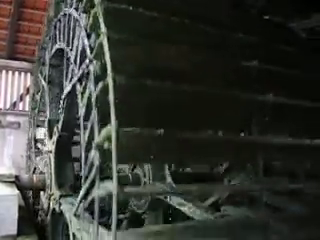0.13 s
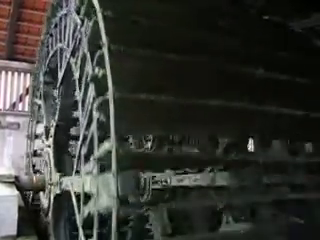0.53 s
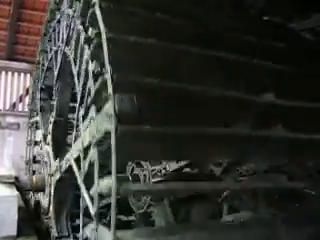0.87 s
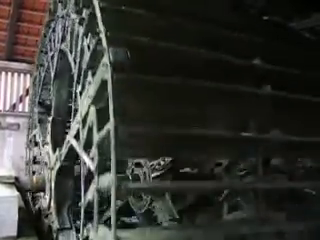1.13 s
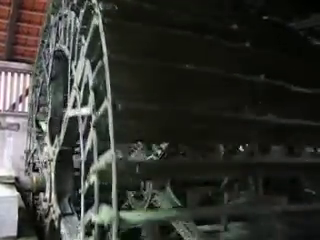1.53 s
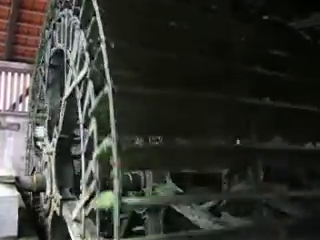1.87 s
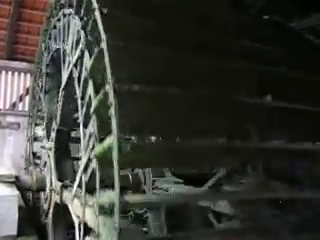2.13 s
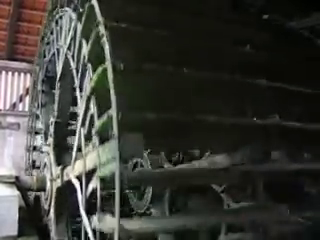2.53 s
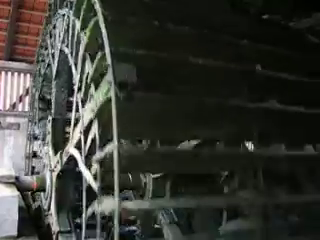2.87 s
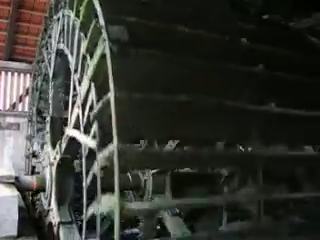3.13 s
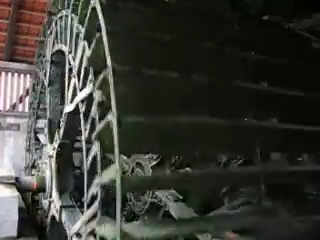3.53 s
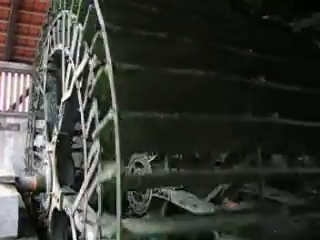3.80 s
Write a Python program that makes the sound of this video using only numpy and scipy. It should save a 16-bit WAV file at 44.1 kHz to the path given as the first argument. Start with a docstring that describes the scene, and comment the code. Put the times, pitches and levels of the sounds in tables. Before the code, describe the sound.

Water rushes steadily through a large turning waterwheel, churning, bubbling and hissing over a deep rumble

```python
"""A large waterwheel turns in its housing while water pours steadily through its buckets.
Filtered noise makes the churning water, hissing spray and deep rumble; narrow bands of noise boom in the housing.
A dense cloud of bubbles is built from short rising tones, and pockets of air gulp as swelling bands of noise.
A low hum, a wavering sine strongest in the first second, sinks unevenly into the rumble.
One tiny tick, a single fading click, sounds midway."""
import sys
import numpy as np
from scipy import signal
from scipy.fft import rfft, irfft
from scipy.io import wavfile
from scipy.ndimage import uniform_filter1d, minimum_filter1d

SR = 44100
rng = np.random.default_rng(int(sys.argv[2]) if len(sys.argv) > 2 else 0)


def to_wav(s):
    """Save 16-bit WAV."""
    ch = np.atleast_2d(s).T  # columns
    pcm = np.round(np.clip(ch, -1, 1) * 32767)  # PCM
    wavfile.write(sys.argv[1], SR, pcm.astype(np.int16))


N = 175518  # length in samples, just under 4 s
T = np.arange(N) / SR  # time in s
HZ = np.arange(N // 2 + 1) * SR / N + 1e-6  # spectrum frequencies; the tiny offset avoids log(0)

# Tone colour of the churning water: f/Hz, level/dB (per Hz)
CHURN_COLOUR = [(50, -30), (95, -8), (122, -1.5), (200, 0.2), (320, -3.5), (540, -1), (770, 0.5), (920, -3),
                (1040, -3), (1330, -9), (1900, -13), (6000, -36.5)]
CHURN_DB, CHURN_FLICKER_DB = -21, 0.75

# Resonances of the housing and buckets: f/Hz, width/Hz, level/dB
HOUSING_RESONANCES = [(118.1, 11, -39), (214, 28, -39.5), (261.7, 19, -43), (303, 34, -40),
                      (400.4, 19, -39.5), (446.5, 32, -37), (702, 50, -40.5), (835, 33, -34.5),
                      (874, 38, -32.8), (932.5, 44, -36)]

# Bubbles: strengths vary at random, but none exceeds BUBBLE_LARGEST_DB before the whole cloud is levelled
BUBBLES_PER_S, BUBBLE_DB, BUBBLE_SPREAD_DB, BUBBLE_LARGEST_DB = 700, -27, 4, 8
BUBBLE_LOW_HZ, BUBBLE_HIGH_HZ = 198.6, 1082  # range of starting pitches
BUBBLE_HALF_CYCLES = 7.3  # half the number of cycles in a ring, before the rise
BUBBLE_RISE = 0.086  # rise by the end, as a share of the starting pitch

# Tone colour of the spray: f/Hz, level/dB (per Hz)
SPRAY_COLOUR = [(600, -17.5), (1400, -1.5), (1900, -2), (2400, 2), (3000, 1), (3350, -1), (3900, -1.5),
                (4450, -1.5), (5000, -5), (6000, -10)]
SPRAY_DB, SPRAY_FLUTTER_DB, SPRAY_FLICKER_DB = -25.5, 0.36, 0.75
DROPS_PER_S, DROP_DB, DROP_SPREAD_DB = 1500, -30, 4.5

# Tone colour of the deep rumble: f/Hz, level/dB (per Hz)
RUMBLE_COLOUR = [(10, -17.5), (24, 0.5), (40, 6.5), (55, -4.5), (75, -12), (130, -20.5)]
RUMBLE_DB, RUMBLE_FADE_DB_PER_S = -30, 1  # starting level and fade

# Level of the low hum over time: t/s, level/dB
HUM_LEVELS = [(0, -32), (.2, -31), (.45, -31.5), (.6, -27), (.95, -26.5), (1.08, -38), (1.45, -34),
              (1.7, -32.5), (1.8, -40), (2.15, -31), (2.5, -45.5), (2.85, -34), (3.3, -41.5), (3.55, -39),
              (3.98, -55)]
HUM_HZ, HUM_WANDER, HUM_WAVER_DB = 56.95, 0.022, 1  # wander is a share of the pitch

# Gulps of trapped air: t/s (loudest moment), length/s (from there until about 17 dB down),
# f/Hz, width (as a share of f), level/dB (at the loudest moment)
AIR_GULPS = [(0.302, 0.15, 824, .2, -27.5), (.36, 0.19, 418, .4, -27.5), (0.508, 0.074, 885, .1, -27.5),
             (0.602, .2, 209, 0.21, -29), (1.14, .2, 226, 0.34, -28.5), (1.2, 0.33, 118, 0.16, -32),
             (1.38, 0.11, 824, .15, -28.5), (1.502, 0.074, 161, .2, -27), (1.6, .14, 874, .2, -27.5),
             (1.75, 0.2, 257, 0.6, -26.5), (1.967, 0.26, 289, .4, -27.5), (2.108, 0.18, 412, .3, -22.5),
             (2.4, 0.17, 120, 0.14, -29), (2.68, 0.28, 165, .55, -28.5), (2.97, 0.13, 342, 0.36, -24),
             (3.253, 0.21, 232, 0.35, -27.5), (3.603, 0.25, 135, 0.23, -33), (3.83, 0.07, 390, 0.22, -23),
             (3.87, 0.23, 199, .21, -26)]

TICK_S, TICK_DECAY_S, TICK_DB = 2.0208, 0.00003, -16.5
ROOM_T60_S, ROOM_DB = 0.5, -4  # time for the echo tail to fall 60 dB, and its level
RUSH_TOP_HZ, TOP_HZ = 5610, 16000  # treble limits of the water sounds and of everything
CEILING_DB, LIMITER_S = -8, 0.0092


def undb(db):
    """Turn decibels into a gain: 20 dB is ten times the amplitude."""
    return 10 ** (np.asarray(db) / 20)


def level(x, db):
    """Set the average strength (rms) of a sound in dB."""
    return x * undb(db) / np.sqrt(np.mean(x ** 2))


def walk(rate):
    """Slow random drift around zero, smoothed from about `rate` new values per second."""
    hold = max(int(SR / rate), 1)
    steps = np.repeat(rng.standard_normal(N // hold + 2), hold)
    smooth = uniform_filter1d(uniform_filter1d(steps, hold), hold)
    start = rng.integers(hold)
    return level(smooth[start:], 0)[:N]


def colour(x, points):
    """Shape a sound's spectrum by a curve of frequency and level."""
    hz, db = np.array(points).T
    curve_db = np.interp(np.log(HZ), np.log(hz), db)
    return irfft(rfft(x) * undb(curve_db), N)


def ring(hz, half_width_hz):
    """A steep resonance stirred by turbulence: noise kept only near one pitch, rms 1."""
    noise = rfft(rng.standard_normal(N))
    return level(irfft(noise / (1 + ((HZ - hz) / half_width_hz) ** 4), N), 0)


def turbulence(flicker_db, rate, count=14):
    """White noise in overlapping half-octave bands, each flickering in level on its own."""
    noise = rfft(rng.standard_normal(N))
    place = np.clip(2 * np.log2(RUSH_TOP_HZ / HZ), 0, count - 1)  # band 0 is the highest
    out = np.zeros(N)
    for k in range(count):
        share = np.maximum(1 - abs(place - k), 0)
        out += irfft(noise * share, N) * undb(flicker_db * walk(rate))
    return out


def room(x):
    """Direct sound plus the wheelhouse's short echo tail, made from fading noise."""
    tail = rng.standard_normal(SR) * np.exp(-np.log(1000) * T[:SR] / ROOM_T60_S)
    tail /= np.sqrt(np.sum(tail ** 2))
    return x + undb(ROOM_DB) * signal.fftconvolve(x, tail)[:N]


def low_pass(x, hz):
    """Cut the treble off steeply."""
    taps = signal.firwin(121, hz, window=("kaiser", 7), fs=SR)
    return signal.fftconvolve(x, taps, mode="same")


def churn():
    """The roar of falling water, as flickering noise, and the resonances that it stirs."""
    roar = level(colour(turbulence(CHURN_FLICKER_DB, 14), CHURN_COLOUR), CHURN_DB)
    boom = sum(undb(db) * ring(hz, width / 2) for hz, width, db in HOUSING_RESONANCES)
    return roar + boom


def bubbles():
    """Countless bubbles, each a short fading ring that rises in pitch."""
    out = np.zeros(N + SR)
    for when, size, strength in rng.random((int(BUBBLES_PER_S * N / SR), 3)):
        hz = BUBBLE_LOW_HZ + (BUBBLE_HIGH_HZ - BUBBLE_LOW_HZ) * size
        length = min(int(2 * BUBBLE_HALF_CYCLES / hz * SR), SR)
        age = np.linspace(0, 1, length)
        phase = 4 * np.pi * BUBBLE_HALF_CYCLES * age * (1 + BUBBLE_RISE * age / 2)
        tone = np.sin(phase) * np.exp(-np.log(100) * age)  # fades by 40 dB
        db = min(-BUBBLE_SPREAD_DB * np.log(1 - strength), BUBBLE_LARGEST_DB)
        start = int(when * N)
        out[start:start + length] += tone * undb(db)
    return level(room(out[:N]), BUBBLE_DB)


def spray():
    """Fine hiss from noise and the patter of drops on the paddles from random clicks."""
    hiss = level(colour(turbulence(SPRAY_FLICKER_DB, 12), SPRAY_COLOUR), SPRAY_DB)
    hits = rng.random(N) < DROPS_PER_S / SR
    signs = rng.choice([-1, 1], N)
    strengths = undb(DROP_SPREAD_DB * np.minimum(rng.exponential(size=N), 5))
    patter = level(colour(room(hits * signs * strengths), SPRAY_COLOUR), DROP_DB)
    return (hiss + patter) * undb(SPRAY_FLUTTER_DB * walk(22.07))


def rumble():
    """A deep rumble under the wheel: low noise that slowly eases."""
    noise = level(colour(rng.standard_normal(N), RUMBLE_COLOUR), RUMBLE_DB)
    return noise * undb(-RUMBLE_FADE_DB_PER_S * T)


def hum():
    """A low sine hum that wavers slightly in pitch and level."""
    times, db = np.array(HUM_LEVELS).T
    hz = HUM_HZ * (1 + HUM_WANDER * walk(5))
    phase = 2 * np.pi * np.cumsum(hz) / SR
    level_db = np.interp(T, times, db) + HUM_WAVER_DB * walk(12)
    return np.sqrt(2) * np.sin(phase) * undb(level_db)  # the root of 2 gives the sine rms 1


def gulps():
    """Large air pockets swell and fade as the buckets plunge; the wider ones slosh."""
    out = np.zeros(N)
    for at, length, hz, width, db in AIR_GULPS:
        swell = np.exp(-2 * ((T - at) / length) ** 2)
        out += undb(db) * swell * ring(hz, width * hz / 2)
    return out


def tick():
    """One tiny, sharp tick, brighter than the water: a click that dies away almost at once."""
    click = np.zeros(N)
    click[int(TICK_S * SR)] = undb(TICK_DB)
    return signal.lfilter([1], [1, -np.exp(-1 / (TICK_DECAY_S * SR))], click)


def scene():
    """Water, air and wheel without high treble, plus the brighter tick."""
    rush = churn() + bubbles() + spray() + rumble() + hum() + gulps()
    return (low_pass(rush, RUSH_TOP_HZ) + tick())[None]


def record(dry):
    """A quick limiter holds down the highest peaks; the very top is cut off steeply."""
    span = max(int(LIMITER_S * SR), 1)
    allowed = 1 / np.maximum(abs(dry[0]) / undb(CEILING_DB), 1)
    gain = uniform_filter1d(minimum_filter1d(allowed, span), span)  # spread each dip, then smooth it
    return low_pass(dry[0] * gain, TOP_HZ)[None]


dry = scene()
out = record(dry)
to_wav(out)
```